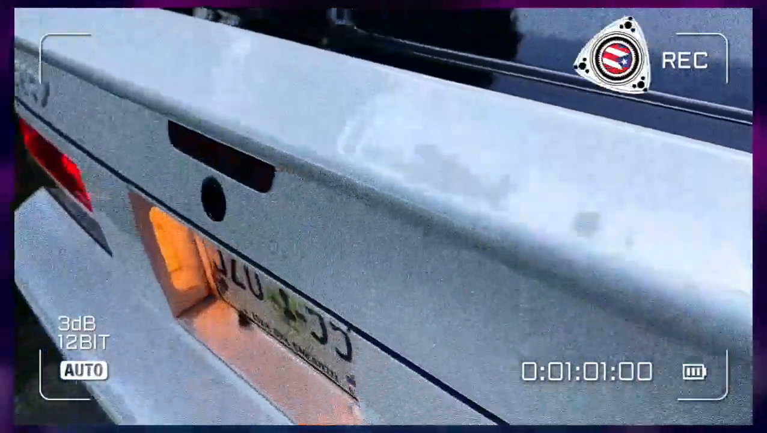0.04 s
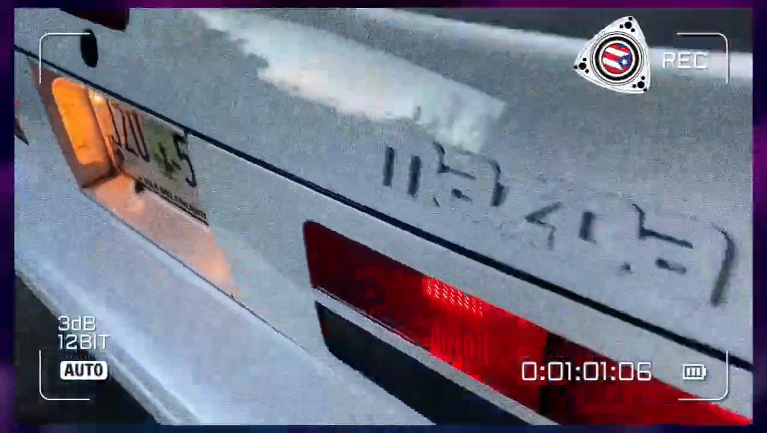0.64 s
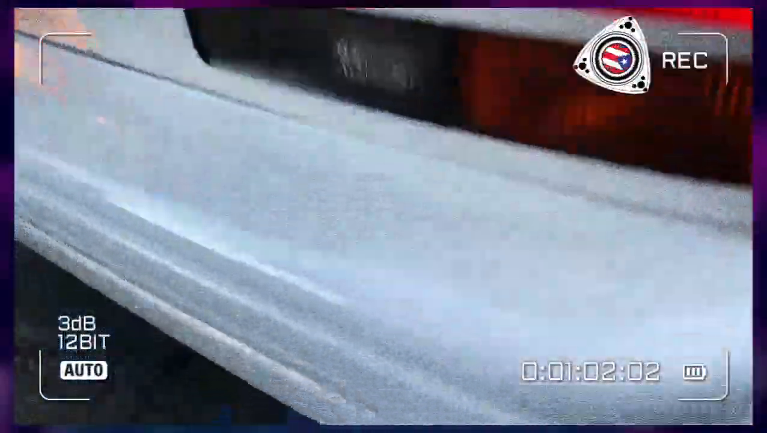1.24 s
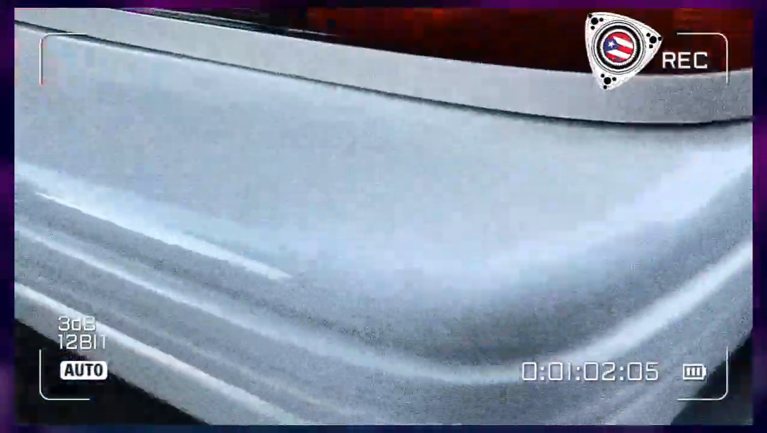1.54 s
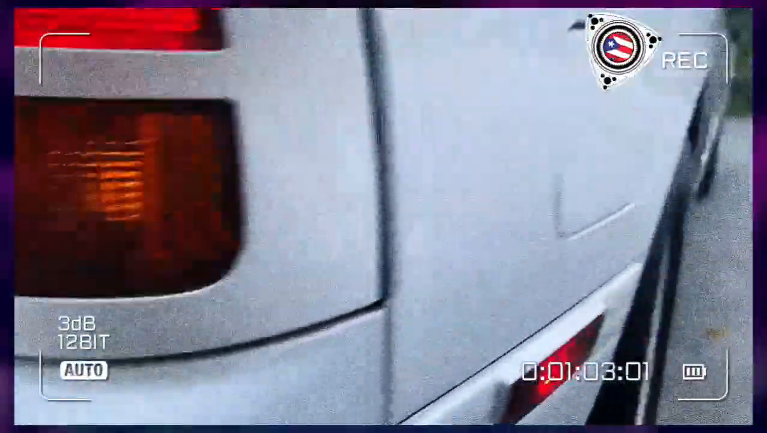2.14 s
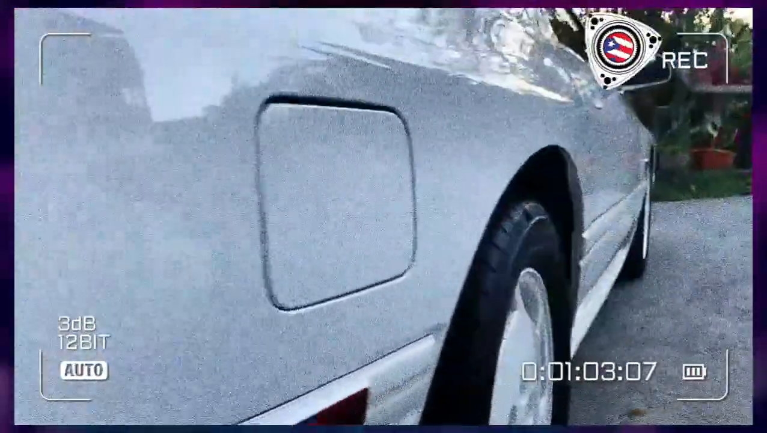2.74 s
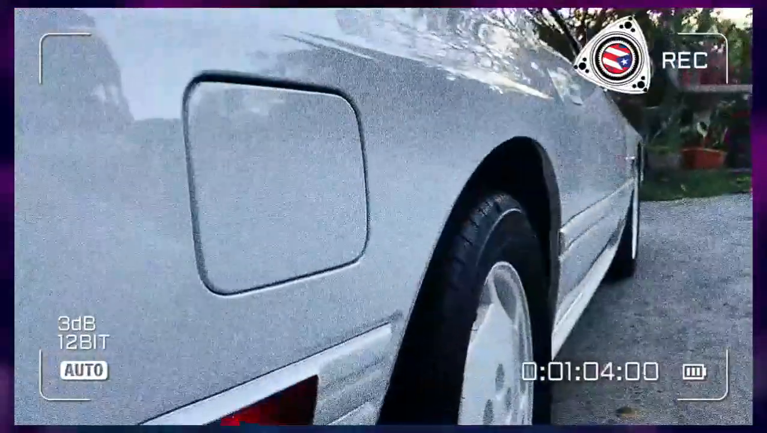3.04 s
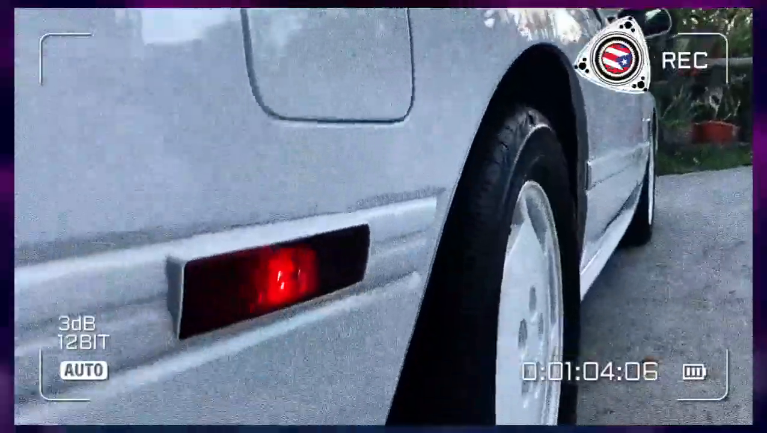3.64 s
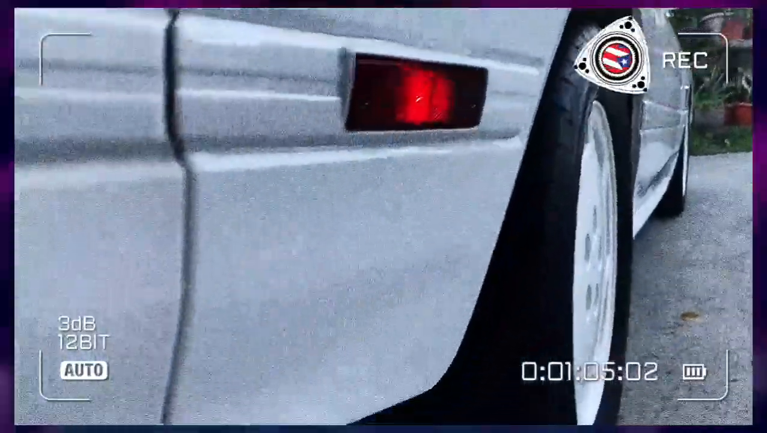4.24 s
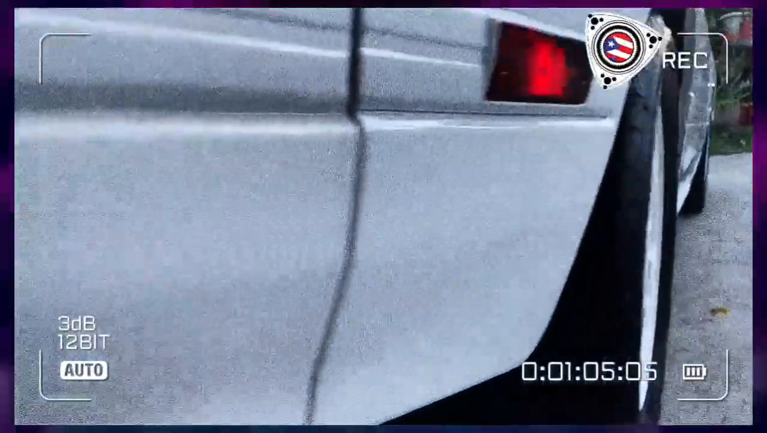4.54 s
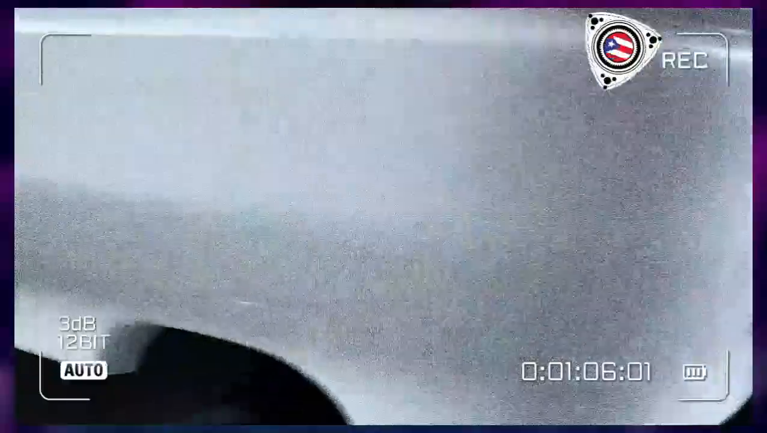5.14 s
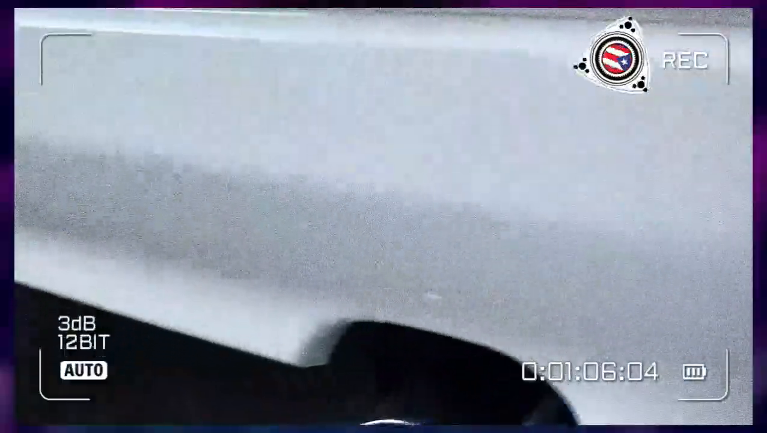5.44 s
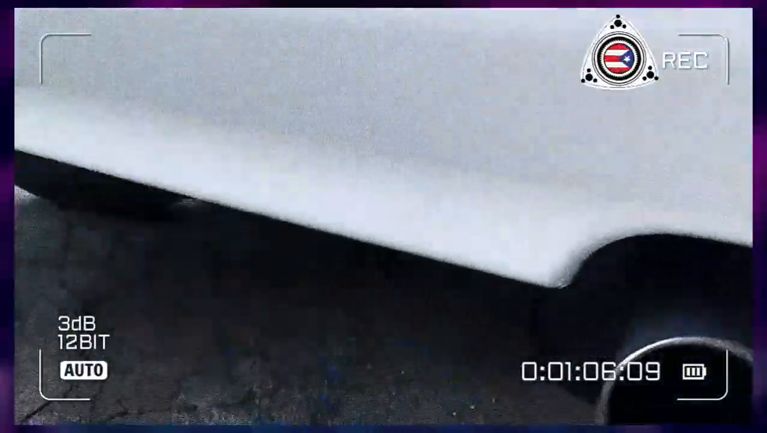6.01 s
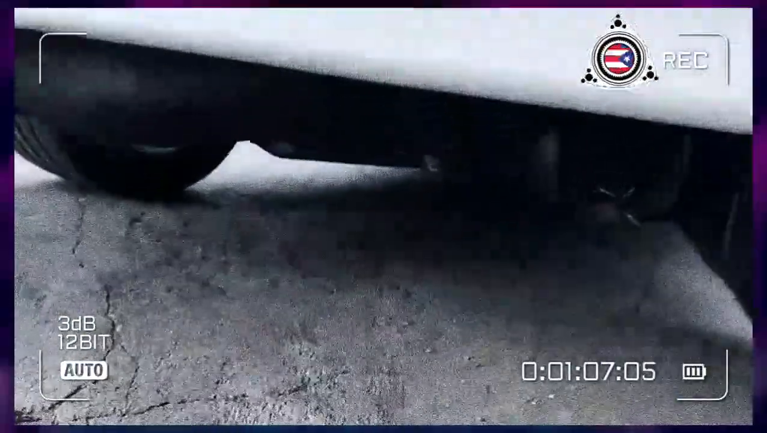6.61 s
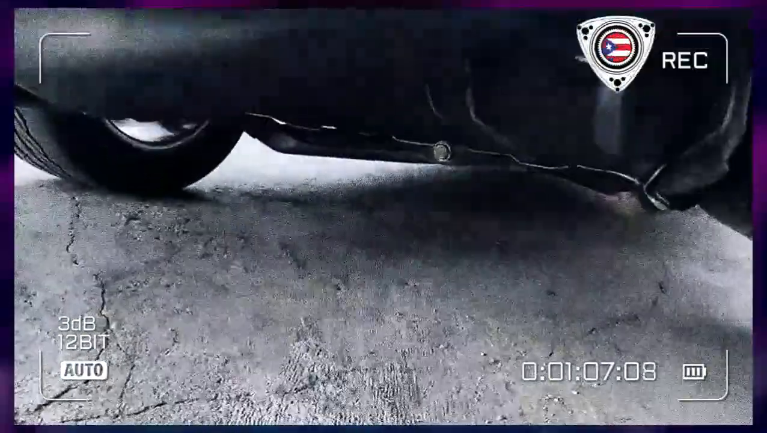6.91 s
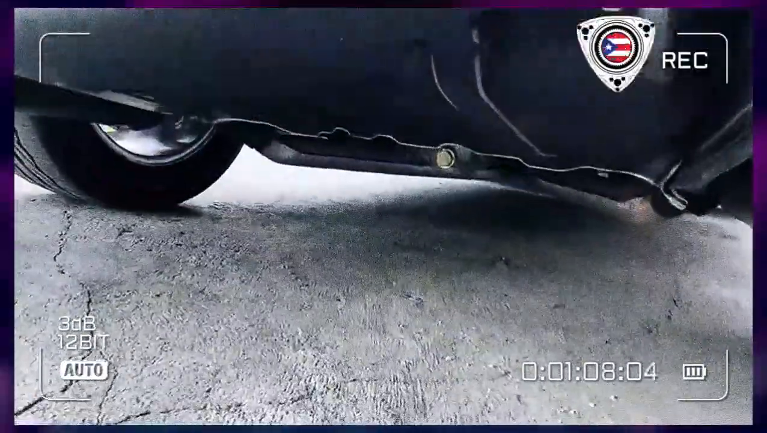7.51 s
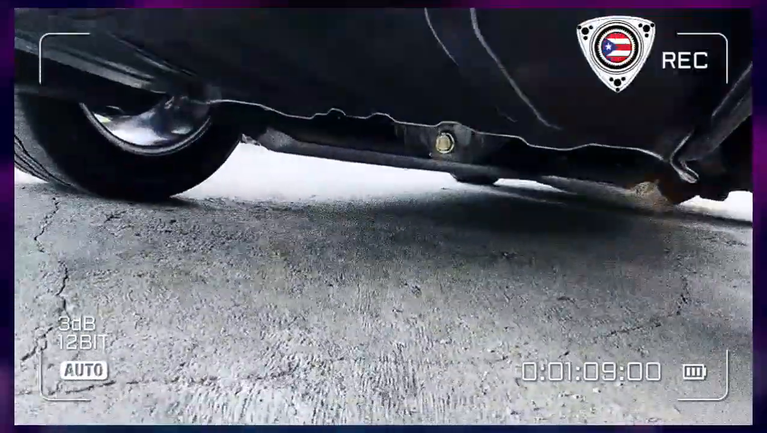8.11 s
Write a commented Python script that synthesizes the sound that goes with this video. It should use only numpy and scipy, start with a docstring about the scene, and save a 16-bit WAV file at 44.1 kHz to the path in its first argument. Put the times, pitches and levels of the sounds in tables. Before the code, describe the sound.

A parked car idles in a driveway with a deep, even throb from the muffler and a burble from the tailpipe. A hand-held stereo microphone moves from above the rear bumper, past the wheel and down close to the pipe, so the exhaust grows louder, with a stronger lope and a light gas hiss. The engine bay whirs faintly further off. A few soft shoe swishes and small ticks come and go.

```python
"""The deep throb of a twin-rotor engine idling in a driveway, on a hand-held stereo microphone.
From 2.4 m off, over the bumper, the microphone moves past the wheel and down to 0.35 m from the
tailpipe. Exhaust pulses make the muffler boom and the pipe burble; gas hisses at the pipe mouth and
the engine bay whirs further off. A few shoe swishes and small ticks come from the recordist."""
import sys
import numpy as np
from scipy import signal
from scipy.fft import rfft, irfft
from scipy.io import wavfile
from scipy.ndimage import uniform_filter1d

SR = 44100
rng = np.random.default_rng(int(sys.argv[2]) if len(sys.argv) > 2 else 0)


def dump_mix(stems):
    """Bounce the given channels to the path in sys.argv[1] as a 16-bit WAV at rate SR."""
    frames = np.atleast_2d(stems).T  # one column per channel
    limited = np.clip(frames, -1, 1)  # hard clip at full scale
    pcm = np.round(limited * 32767).astype(np.int16)
    wavfile.write(sys.argv[1], SR, pcm)


N = 364266
TIME = np.arange(N) / SR

# idle speed: (time [s], shaft speed [Hz])
SHAFT_SPEED = [(0.0, 27.51), (1.49, 28.22), (1.72, 27.65), (2.69, 27.8), (3.38, 27.34), (5.06, 27.92),
               (5.15, 27.31), (5.96, 27.91), (6.21, 27.53), (6.58, 27.8), (7.01, 27.35), (8.26, 27.66)]
# microphone position: (time [s], place [0 over the bumper, 1 beside the wheel, 2 and up at the pipe])
MIC_PLACE = [(0, 0.14), (1.8, 0.046), (2.4, 0.92), (4.5, 1.057), (5.7, 1.7), (6.6, 1.93), (8.26, 2.14)]
# microphone to tailpipe: (time [s], distance [m])
MIC_DISTANCE = [(0, 2.4), (1.5, 1.25), (2.7, 1.55), (4.6, 1.06), (5.5, .92), (6.3, 0.51), (8.26, 0.35)]
# muffler boom at the microphone: (time [s], level [dB])
BOOM_LEVEL = [(0.1, -17), (1.59, -14), (2.67, -16.5), (4.56, -13.5), (5.2, -11.5), (6.1, -10.5), (8.2, -11)]
# direction of the boom: (time [s], left minus right [dB])
BOOM_BALANCE = [(0, .2), (1.2, .2), (2.2, 1.8), (4.2, 2), (6.1, -.2), (7, -3.5), (8.26, -4.6)]
# exhaust pulse from each place, before its echo in the pipe: (order [x shaft speed], level [dB])
PULSE_AT_BUMPER = [(1, -28.5), (2, 4), (3, -9.5), (4, -12), (5, -1), (6, -18), (7, -11.5), (8, -23),
                   (9, -17), (10, -17.5), (11, -32.5), (12, -35.5), (13, -33), (14, -32.5), (15, -39),
                   (16, -34), (17, -39.5), (18, -36), (19, -37), (20, -47), (21, -51.5), (22, -35),
                   (23, -64), (24, -53), (25, -73), (26, -68), (27, -66), (28, -66)]
PULSE_AT_WHEEL = [(1, -24), (2, 1), (3, -12), (4, -11.5), (5, -3.5), (6, -23), (7, -15), (8, -23.5),
                  (9, -19.5), (10, -26), (11, -25.5), (12, -30), (13, -27.5), (14, -22), (15, -27.5),
                  (16, -29), (17, -32), (18, -25), (19, -33.5), (20, -31), (21, -42), (22, -30), (23, -48),
                  (24, -37), (25, -52.5), (26, -46), (27, -36.5), (28, -34.5)]
PULSE_AT_PIPE = [(1, -13), (2, 2.5), (3, -5), (4, -10), (5, -0.5), (6, -16), (7, -15.5), (8, -29.5),
                 (9, -17.5), (10, -24), (11, -32), (12, -23), (13, -19), (14, -21.5), (15, -34.5),
                 (16, -31.5), (17, -30), (18, -30), (19, -26.5), (20, -29.5), (21, -38.5), (22, -27),
                 (23, -38.5), (24, -39.5), (25, -55), (26, -44), (27, -44.5), (28, -53)]
# tailpipe resonances, from a step away and close up: (frequency [Hz], width [Hz], level [dB])
PIPE_MODES_AWAY = [(383, 85, -0.5), (524, 73, -3), (611, 29, -9.5), (763, 135, -6.5)]
PIPE_MODES_CLOSE = [(310, 51, 6), (400, 66, 4), (504, 36, 6.5), (630, 65, -8)]
# noise spectra of gas rumble, gas hiss, engine bay and tick: (frequency [Hz], level [dB])
RUMBLE_SPECTRUM = [(10, -4), (27, 4), (42, 1), (75, -2), (140, 2), (250, -8), (450, -28), (1500, -70)]
HISS_SPECTRUM = [(1000, -4.5), (2800, -21), (3600, 1), (4500, 3.5), (5600, 0.5), (7000, 4.5), (8200, 2),
                 (10000, -3), (11500, 0), (13000, -3.5)]
BAY_SPECTRUM = [(150, -12), (350, 3), (700, 4), (950, -0.5), (1400, -4), (2000, -8), (3000, -11.5),
                (5000, -10.5), (12000, -29.5)]
TICK_SPECTRUM = [(500, -14), (1200, -5), (2000, 0), (3200, -5), (5400, 1), (7500, -8), (10000, -10),
                 (13000, -20)]
# soles on concrete: (time [s], rise [s], decay [s], start pitch [Hz], glide [Hz/s], width [Hz], level [dB])
SHOE_SWISHES = [(0.296, 0.027, 0.088, 4160, -3200, 450, -45), (.365, .02, .04, 3230, -1000, 300, -52),
                (1.02, 0.0057, 0.12, 2175, 0, 3600, -41.5), (5.089, 0.073, 0.1, 4390, 1522, 900, -38.5)]
# small hard contacts: (time [s], relative level [dB], ring [Hz])
CONTACTS = [(2.4070, -13, 4270), (4.3770, -11, 2376), (7.283, -31, 5500)]
# microphone port resonances: (frequency [Hz], width [Hz], share added [ratio])
MIC_PORT = [(7620, 760, -1.25), (8130, 510, 1.39)]

HUNT_HZ, HUNT_PER_S = 0.061, 5  # the idle hunts a little: depth and rate
# carry to the microphone: (level at 1 m [dB], loss per doubled distance [dB], loss behind the car [dB])
BURBLE_REACH, BAY_REACH, HISS_REACH = (-35.5, 6.4, 0.3), (-42, 2.07, 3.7), (-47, 6.1, 5.2)
RIGHT_LAG_S = .0005  # the boom reaches the right channel late over the bumper; no lag at the pipe
BOOM_FLUTTER_DB, BURBLE_FLUTTER_DB = 0.63, 1.16  # from firing to firing
RUMBLE_DB, TURBULENCE_AWAY_DB, TURBULENCE_CLOSE_DB = -16.5, -4.5, -10  # noise beside the exhaust note
LOPE_AWAY_DB, LOPE_CLOSE_DB = .4, 3.8  # swing of strong and weak turns about the mean
TREBLE_CUT_HZ = 12000


def undb(db):
    """Decibels to gain."""
    return 10 ** (np.asarray(db) / 20)


def unit(x):
    """Scale to rms 1."""
    return x / np.sqrt(np.mean(x ** 2))


def curve(table):
    """A (time, value) table at every sample."""
    return np.interp(TIME, *np.transpose(table))


def wander(rate_hz):
    """Smooth chance with about rate_hz new values a second; rms 1."""
    return unit(signal.resample(rng.standard_normal(int(rate_hz * N / SR)), N))


def band(x, hz, width):
    """One resonance, gain 1 at its centre."""
    return signal.lfilter(*signal.iirpeak(hz, hz / width, fs=SR), x)


def minimum_phase(db):
    """Response of a passive resonator with these gains at even frequency steps."""
    cepstrum = irfft(np.log(undb(db)))
    half = len(cepstrum) // 2
    cepstrum[1:half] *= 2
    cepstrum[half + 1:] = 0
    return np.exp(rfft(cepstrum))


def colour(x, spectrum, size=1024):
    """Filter both channels with a (frequency [Hz], level [dB]) response."""
    hz, db = np.transpose(spectrum)
    grid_hz = np.maximum(np.arange(size // 2 + 1) * SR / size, 1)
    impulse = irfft(minimum_phase(np.interp(np.log(grid_hz), np.log(hz), db)))
    return signal.fftconvolve(x, impulse[None], axes=1)[:, :N]


def spread(mid, side):
    """Left and right from mid and side."""
    return np.array([mid + side, mid - side])


def stereo_noise(side_db):
    """White noise, partly alike in both channels."""
    mid, side = rng.standard_normal((2, N))
    return unit(spread(mid, undb(side_db) * side))


def swell(turns, peak_at, depth_db):
    """A gain that swells once a turn, peaking at the given fraction of it."""
    return undb(depth_db * np.cos(2 * np.pi * (turns - peak_at)))


def band_flicker(x, depth_db, size=512):
    """A grainy flicker: each narrow band of the noise swells and fades at random."""
    bins = signal.stft(x, nperseg=size)[2]
    chance = uniform_filter1d(rng.standard_normal(bins.shape[1:]), size=4, axis=0)
    chance = unit(uniform_filter1d(chance, size=6, axis=1))
    return signal.istft(bins * undb(depth_db * chance), nperseg=size)[1][:, :N]


def reach(layer, place):
    """Gain at the microphone: it falls with distance, and the car's tail shades it over the bumper."""
    level_db, doubling_db, shade_db = layer
    hidden = np.clip(1 - place, 0, 1)
    return undb(level_db - doubling_db * np.log2(curve(MIC_DISTANCE)) - shade_db * hidden)


def exhaust_note(turns, place, reflection, echo_turns, orders):
    """A blow-down pulse each turn rings the pipe over a span of orders and returns from its far end."""
    note = np.zeros(N)
    for spot, table in enumerate((PULSE_AT_BUMPER, PULSE_AT_WHEEL, PULSE_AT_PIPE)):
        order, db = np.transpose([(0, -46)] + list(table))
        echo = np.exp(-2j * np.pi * order * echo_turns)
        response = minimum_phase(db) * (reflection + echo) / (1 + reflection * echo)
        in_span = (order >= orders[0]) & (order <= orders[1])
        cycle = unit(irfft(response * in_span, 1024))
        nearness = np.maximum(1 - abs(place - spot), 0)
        note += nearness * np.interp(turns, np.arange(len(cycle)) / len(cycle), cycle, period=1)
    return note / np.sqrt(uniform_filter1d(note ** 2, SR // 2))  # even level from place to place


def muffler_boom(turns, place):
    """The muffler's deep throb, strongest at two firings a turn, over a low gas rumble."""
    uneven_turns = turns - .22 + .004 * wander(28)
    note = exhaust_note(uneven_turns, place, reflection=0.796, echo_turns=0.259, orders=(2, 10))
    throb = note * undb(BOOM_FLUTTER_DB * wander(40))
    lag_s = RIGHT_LAG_S * (1 - place / 2)
    channels = np.array([throb, np.interp(TIME - lag_s, TIME, throb)])
    rumble = undb(RUMBLE_DB) * unit(colour(stereo_noise(side_db=-8), RUMBLE_SPECTRUM, size=4096))
    pan_db = curve(BOOM_BALANCE)
    return (channels + rumble) * undb(curve(BOOM_LEVEL) + np.array([pan_db, -pan_db]) / 2)


def pipe_ring(puff, modes):
    """Gas rings the tailpipe; the muffler shuts off what lies above and below its resonances."""
    ring = sum(undb(db) * band(puff, hz, width) for hz, width, db in modes)
    return unit(signal.sosfilt(signal.butter(5, [285, 740], "band", fs=SR, output="sos"), ring))


def pipe_burble(turns, place):
    """The upper exhaust note and its turbulent puffs; close up, strong and weak turns alternate."""
    close = np.clip(place - 1, 0, 1)
    away = 1 - close
    uneven_turns = turns - .24 + .003 * wander(56)
    note = exhaust_note(uneven_turns, place, reflection=0.69, echo_turns=.31, orders=(11, 28))
    # the ground sends the note back from the side; its path changes as the hand moves
    path_turns = .1 + .012 * wander(2)
    bounce = exhaust_note(uneven_turns - path_turns, place, reflection=.5, echo_turns=.2, orders=(16, 28))
    puffs = rng.standard_normal((2, N)) * swell(turns, peak_at=0.19, depth_db=2.0)
    direct, scattered = (np.sqrt(away) * pipe_ring(puff, PIPE_MODES_AWAY)
                         + np.sqrt(close) * pipe_ring(puff, PIPE_MODES_CLOSE) for puff in puffs)
    turbulence = undb(TURBULENCE_AWAY_DB * away + TURBULENCE_CLOSE_DB * close) * direct
    lope = swell(turns / 2, peak_at=0.33, depth_db=LOPE_AWAY_DB * away + LOPE_CLOSE_DB * close)
    mid = note * undb(BURBLE_FLUTTER_DB * wander(56)) + undb(-10) * away * bounce + turbulence
    side = undb(-6.5 - 9.6 * close) * (bounce + undb(-11.5) * scattered)  # narrower at the pipe
    return lope * spread(mid, side)


def engine_bay(turns):
    """Fan and belts whir under the car, pulsing slightly with the shaft."""
    surge = swell(turns, peak_at=.35, depth_db=.9) * undb(.6 * wander(40))
    whir = colour(stereo_noise(side_db=-2) * surge, BAY_SPECTRUM)
    return unit(band_flicker(whir, depth_db=2.5))


def gas_hiss(turns):
    """Hiss at the pipe mouth, swelling as each pulse leaves and fluttering between."""
    surge = swell(turns, peak_at=0.41, depth_db=0.93) * undb(1.2 * wander(110))
    hiss = colour(stereo_noise(side_db=-2.5) * surge, HISS_SPECTRUM)
    return unit(band_flicker(hiss, depth_db=2.5))


def shoe_swishes():
    """The recordist's soles brush the concrete, some swishes narrow and squeaky with a gliding pitch."""
    out = np.zeros((2, N))
    for start, rise, decay, hz, glide, width_hz, db in SHOE_SWISHES:
        age = TIME - start
        envelope = np.clip(age / rise, 0, 1) * np.exp(-np.maximum(age - rise, 0) / decay)
        rub = signal.sosfilt(signal.butter(2, width_hz / 2, fs=SR, output="sos"), stereo_noise(side_db=2))
        carrier = np.cos(2 * np.pi * (hz + glide * age / 2) * age)
        out += undb(db) * envelope * unit(rub * carrier)
    return out


def ticks():
    """Hard little contacts: a crack with a brief ring and a short tail off the car body."""
    out = np.zeros((2, N))
    for start, db, ring_hz in CONTACTS:
        age = np.maximum(TIME - start, 0)
        tail = undb(-18) * np.exp(-age / .012)
        crack = (TIME >= start) * (np.exp(-age / 0.0032) + tail) * stereo_noise(side_db=1.5)
        ring = undb(-2) * band(crack[::-1], ring_hz, width=250)
        out += undb(db - 1.5) * (colour(crack, TICK_SPECTRUM) + ring)
    return out


def scene():
    """The shaft drives every engine layer; the microphone's place and distance set the balance."""
    speed_hz = curve(SHAFT_SPEED) + HUNT_HZ * wander(HUNT_PER_S)
    turns = np.cumsum(speed_hz) / SR
    place = np.clip(curve(MIC_PLACE), 0, 2)
    boom = muffler_boom(turns, place)
    burble = reach(BURBLE_REACH, place) * pipe_burble(turns, place)
    whir = reach(BAY_REACH, place) * engine_bay(turns)
    hiss = reach(HISS_REACH, place) * gas_hiss(turns)
    return boom + burble + whir + hiss + ticks() + shoe_swishes()


def record(dry):
    """The microphone port notches and lifts the treble; the top is cut."""
    for hz, width, share in MIC_PORT:
        dry = dry + share * band(dry, hz, width)
    return signal.sosfilt(signal.ellip(10, .2, 80, TREBLE_CUT_HZ, fs=SR, output="sos"), dry)


dry = scene()
out = record(dry)
dump_mix(out)
```